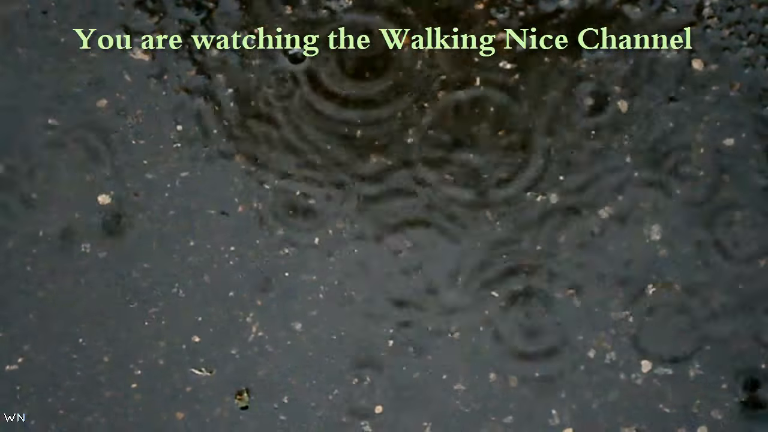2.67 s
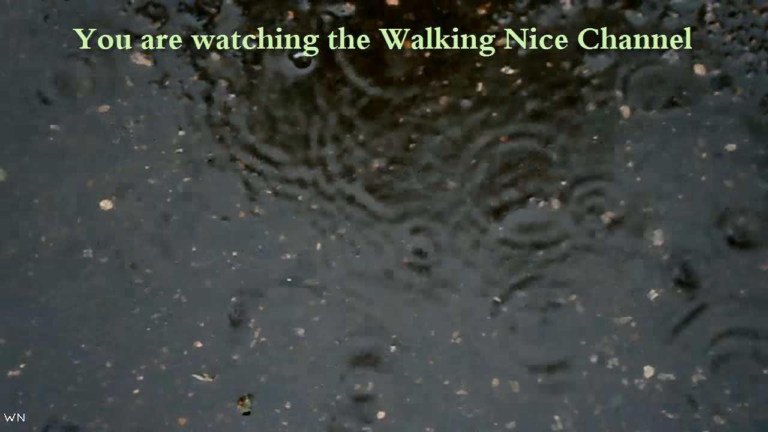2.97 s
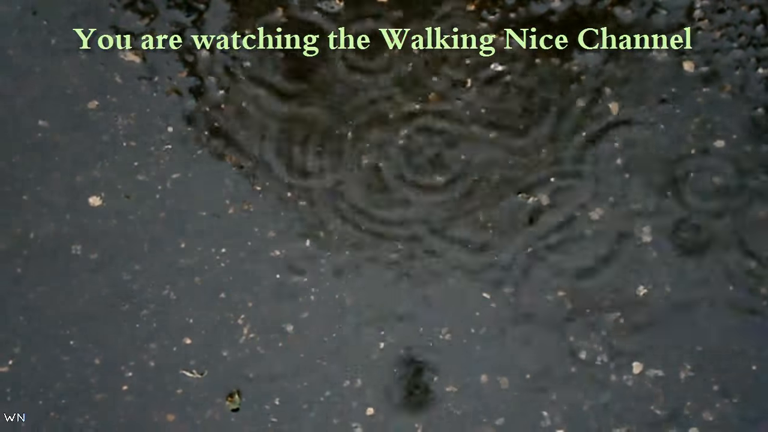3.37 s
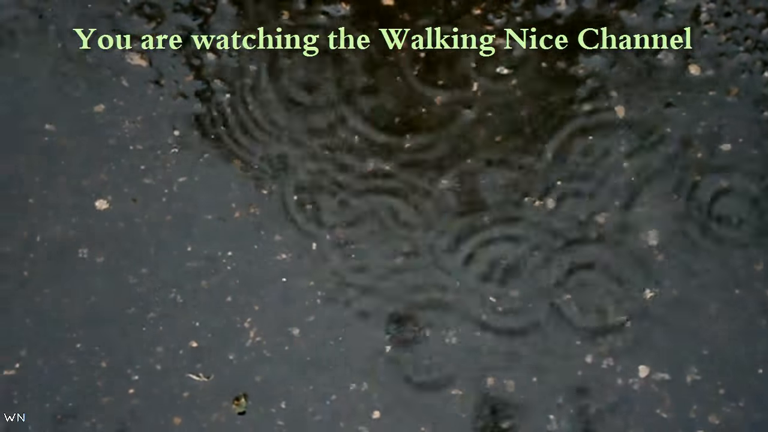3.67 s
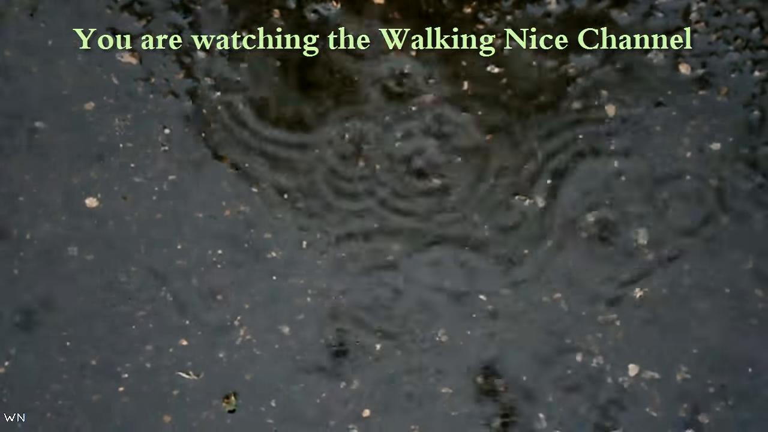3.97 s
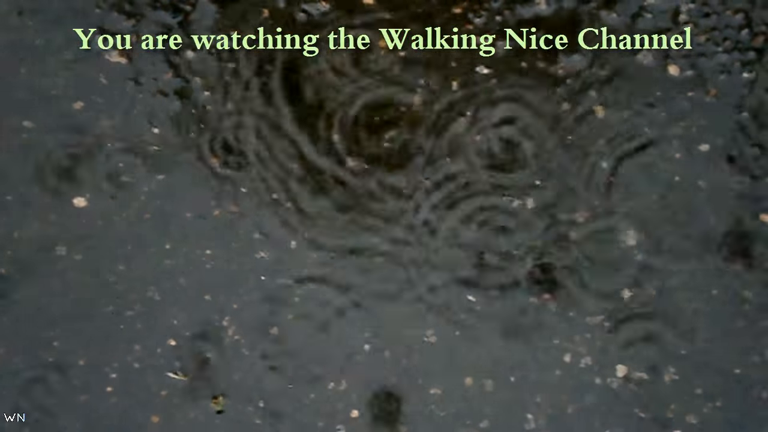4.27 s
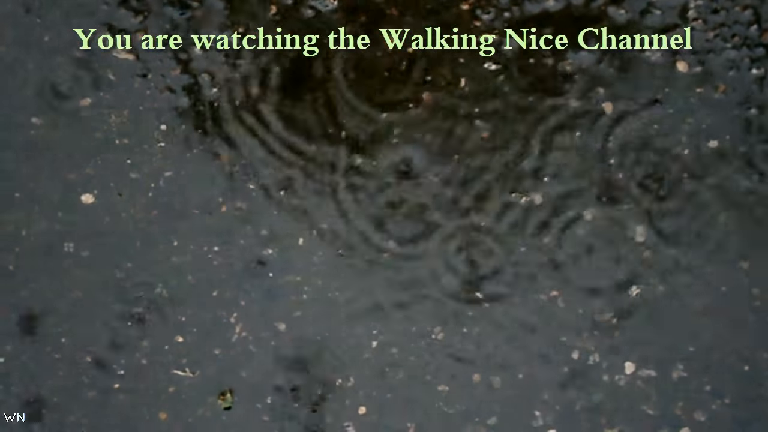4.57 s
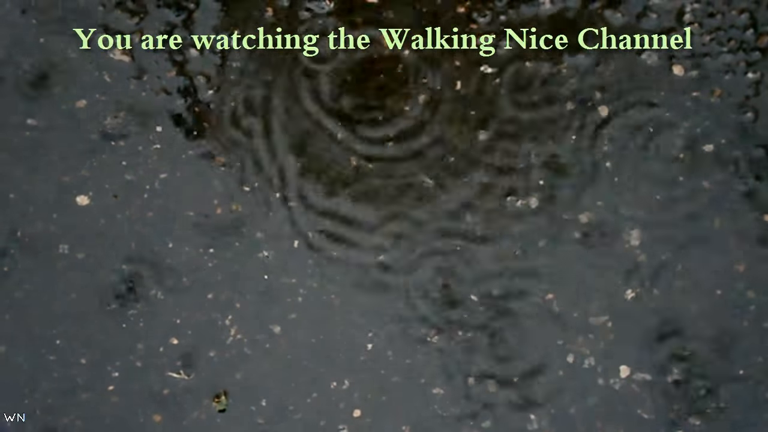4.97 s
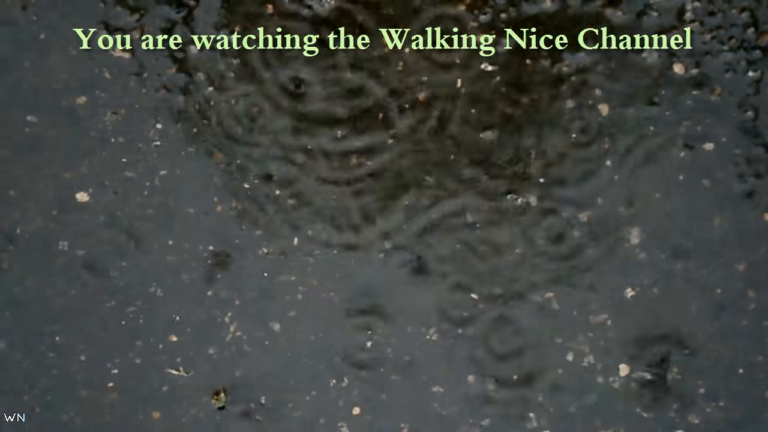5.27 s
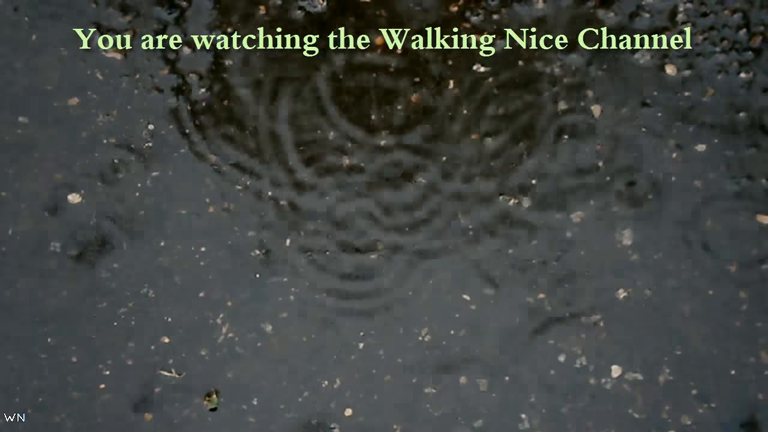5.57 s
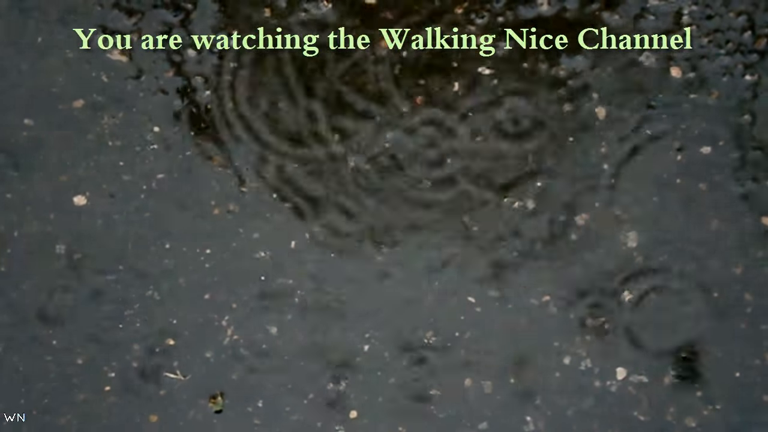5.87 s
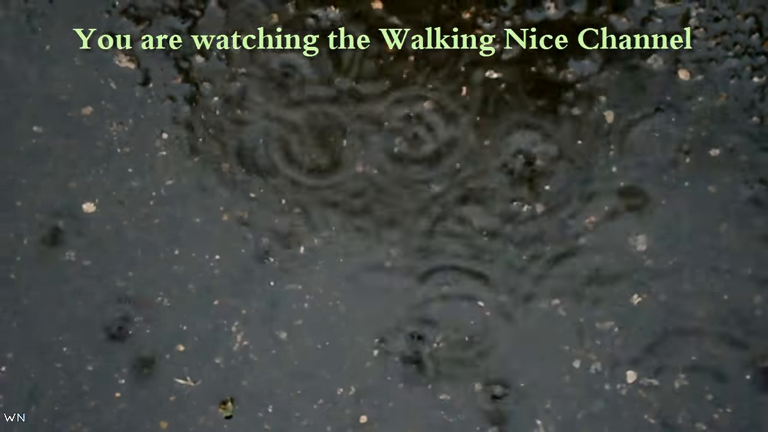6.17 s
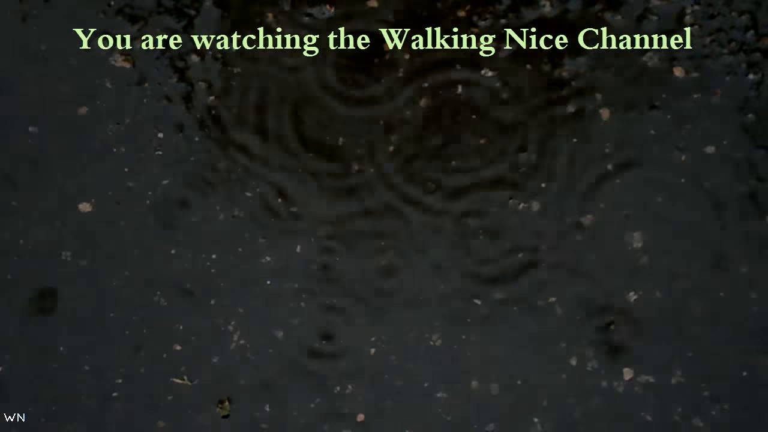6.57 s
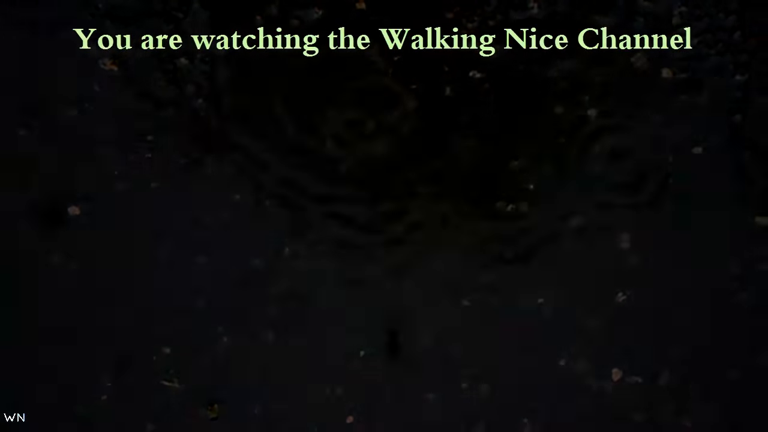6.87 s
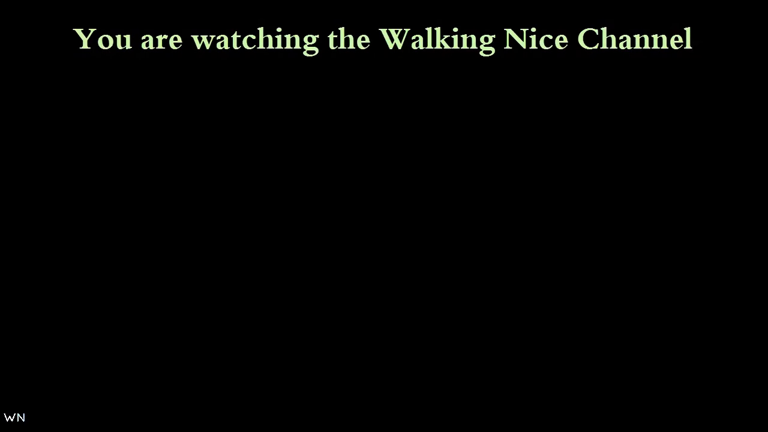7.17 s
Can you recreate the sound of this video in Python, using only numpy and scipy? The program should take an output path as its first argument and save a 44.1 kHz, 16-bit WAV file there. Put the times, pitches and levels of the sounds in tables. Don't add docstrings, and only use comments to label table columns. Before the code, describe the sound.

Steady rain on wet pavement and a puddle, captured close by a cheap camera with a coarse, gritty, brittle top end. From 0 s a smooth far wash and dense fine patter run continuously, dipping slightly around 0.5 s. Irregular nearby drops snap over it as short clumps of bright ticks with tiny sprays. At about 0.75 s a puddle plop comes with a hard knock on the housing and watery chirps; more splashes cluster near 1.1-1.3 s, and low bubble blips follow around 1.5-1.8 s. From 2.9 to 3.8 s the rain is busiest, with strong plops, rising bubble chirps and the hardest bump near 3.1 s, another at 3.7 s. From 4.2 s everything fades gradually, scattered ticks still audible. A last faint cluster of splashes, bubbles and a double knock comes near 6.8 s, then silence by about 7.2 s.

```python
import sys
import numpy as np
from scipy import signal
from scipy.fft import rfft, irfft, next_fast_len
from scipy.io import wavfile
from scipy.ndimage import uniform_filter1d, map_coordinates

SR = 44100
rng = np.random.default_rng(int(sys.argv[2]) if len(sys.argv) > 2 else 0)


def ratio_of_db(decibels):
    return 10 ** (np.asarray(decibels, float) / 20)


def master_out(mix):
    frames = np.transpose(np.atleast_2d(mix))
    ceiling = np.clip(frames, -1, 1)
    pcm = np.round(ceiling * 32767).astype(np.int16)
    wavfile.write(sys.argv[1], SR, pcm)


N = 322812

# (time [s], patter level [dB], far wash level [dB])
RAIN = [(0, -33.5, -36), (.4, -36, -35.5), (.55, -37, -36), (.9, -34, -36.5), (1.4, -35, -36.5),
        (1.65, -33.5, -35.5), (2.3, -35, -36.5), (2.75, -33.5, -36), (3.1, -33, -36), (3.5, -31.5, -35),
        (3.75, -32.5, -36.5), (4.2, -32, -36), (4.8, -34, -37), (5.6, -35, -36.5), (6.3, -33.5, -36),
        (6.7, -33.5, -35.5), (7.3, -33, -39.5)]
# (frequency [Hz], level per Hz [dB])
WASH_COLOUR = [(35, -32), (60, -11), (200, -4.5), (420, -4.5), (740, 0.83), (1280, 1.5), (1520, -2.5),
               (2460, -2), (3400, 0.5), (4200, 5), (4700, -43)]
# (frequency [Hz], width [Hz], level [dB])
GROUND_RINGS = [
    (1300, 890, -18),
    (2097, 840, -7.5),
    (2900, 550, -3),
    (3373, 506, 1),
    (3719, 150, -4),
    (4040, 670, -5),
]
# (time [s], peak level [dB], pitch [Hz], time to fall 60 dB [s])
BUBBLES = [(0.778, -27, 2390, 0.04), (0.848, -26, 2250, 0.04), (1.302, -25, 2290, 0.04),
           (1.478, -29.5, 925, 0.04), (1.523, -23, 2180, 0.037), (1.575, -32, 740, 0.044),
           (1.764, -27, 665, 0.048), (2.864, -23, 2330, 0.037), (2.919, -25, 1600, 0.031),
           (3.032, -37, 670, 0.055), (3.251, -28, 2170, 0.04), (3.291, -36, 1590, 0.056),
           (3.368, -22.5, 2350, 0.037), (3.847, -25.5, 1255, 0.037), (5.531, -30, 1390, 0.04),
           (5.763, -25, 1650, 0.035), (6.229, -35, 2100, 0.04), (6.275, -26, 1000, 0.04),
           (6.509, -23, 1110, 0.04), (6.66, -29, 1700, 0.04), (6.691, -28, 1590, 0.04),
           (6.706, -24, 2060, 0.04), (6.784, -27, 1780, 0.04), (6.822, -21, 2400, 0.045),
           (6.828, -33.7, 1300, 0.04), (7.056, -25, 1750, 0.044)]
# (time [s], push level [dB], length [ms])
KNOCKS = [
    (0.7502, -8.5, 0.26),
    (1.1635, -23.5, 0.58),
    (1.82, -24, 0.36),
    (2.312, -28, 0.9),
    (3.1397, -7.5, 0.46),
    (3.6693, -8.5, 0.28),
    (4.859, -21, 0.36),
    (6.8102, -8, 0.26),
    (6.8181, -9, 0.3),
]
# (time [s], peak level [dB], spray level [dB])
HEAVY = [(0.0877, -18, -28), (0.3619, -18, -30), (1.0962, -13.5, -25), (1.1273, -12, -27),
         (1.166, -15.5, -21.5), (1.3097, -14.5, -26), (1.659, -13, -32), (1.8046, -18.5, -18.5),
         (2.2552, -15.7, -30.5), (2.3134, -10.5, -25.5), (2.3907, -17, -25), (2.5876, -13, -32),
         (2.9071, -12.5, -27), (3.1445, -15.5, -29), (3.2573, -13, -33.5), (3.2768, -14, -20),
         (3.2907, -15, -33.5), (3.7125, -13.5, -34.5), (4.4296, -18, -19.5), (4.6227, -11.5, -35),
         (4.8593, -12, -21), (5.15, -15.4, -22), (5.1582, -18, -21), (5.354, -12.5, -26),
         (5.815, -13, -21.5), (5.8506, -15, -34.5), (5.9937, -11, -33.5), (6.1485, -10, -26),
         (6.3777, -14.5, -21.5), (6.8199, -11.4, -27.5)]
# (time [s], peak level [dB])
LIGHT = [(0.0794, -13), (.1379, -18), (0.3395, -16.5), (0.3754, -17.5), (.5952, -13.5), (.7999, -28),
         (.878, -17.5), (.9983, -25), (1.5072, -19), (1.7387, -16), (2.0657, -18.5), (2.1759, -17.5),
         (2.2198, -12), (2.2952, -17.5), (2.5056, -24.5), (2.523, -14.5), (3.0445, -12.5), (3.082, -18),
         (3.2035, -17), (3.3883, -16), (3.9964, -17), (3.6958, -20.5), (4.0334, -17), (4.4974, -20),
         (4.7851, -18), (5.4604, -16.5), (5.6987, -16), (5.8852, -12), (6.5923, -16.3), (7.059, -19.5)]
# (time [s], peak level [dB], deeper part against the peak [dB], spray level [dB])
PLOPS = [(.1966, -18.5, -24, -22), (.6528, -21, -16, -39), (0.7493, -13.5, -6.5, -24.5),
         (0.7751, -14.5, -4.5, -20.5), (.8496, -35, -2, -20), (1.0817, -21, -7, -29),
         (1.2078, -17.1, -10, -23), (1.29, -23, -7, -21.5), (1.5293, -26, -5, -27), (1.615, -17, -5, -24.5),
         (2.0093, -18, -23, -20.5), (2.5578, -17.5, -24, -32), (2.7031, -17.5, -10, -33),
         (2.8647, -13, -20, -22.5), (2.8785, -20.4, -3, -21), (3.0032, -17.5, -16, -20.5),
         (3.1403, -7.5, -10, -24.5), (3.1646, -20, -13, -39), (3.2352, -18, 1, -22.5),
         (3.2409, -12, -14, -36), (3.6677, -13.5, -8.5, -22), (3.7615, -19, -16, -22),
         (3.8918, -15.5, -15.5, -32), (4.4006, -12, -13, -31.5), (5.0673, -21, -4, -20.5),
         (5.3758, -21, -7.6, -21), (5.566, -19.5, -9, -38.5), (5.7822, -16, -19, -33),
         (6.1719, -15.5, -13.5, -26.5), (6.8077, -14, -16, -16)]
# (time [s], gain [times])
FADE = [
    (0, 1),
    (4.23, 1),
    (7.238, 0),
]

PAVEMENT_DEEP_DB, LIGHT_SPRAY_DB = -21.5, -10
SPRAY_DB, SPRAY_T60_S, SPRAY_RISE_S = 1, 0.1, 0.0035
STRAYS = 190
STRAY_DB, STRAY_SPREAD_DB, STRAY_DEEP_DB, STRAY_SPRAY_DB = -23, 1.12, -17, -13.5
SNAP_DB, SNAP_LAG = 8, 30
CLOCK_HZ = 8000
SLIP, SLIP_EVERY, SLIP_LEAD = 2, 11023, 1000
EDGE_HZ = 15740


def evened(x):
    return x / np.sqrt(np.mean(x ** 2) + 1e-20)


def along(rows, column):
    rows = np.array(rows)
    return np.interp(np.arange(N) / SR, rows[:, 0], rows[:, column])


def add(mix, s, sound):
    part = mix[round(s * SR):][:len(sound)]
    part += sound[:len(part)]


def coloured(x, points):
    size = next_fast_len(len(x))
    f, db = np.transpose(points)
    hz = np.fft.rfftfreq(size, 1 / SR)
    gain = ratio_of_db(np.interp(np.log(hz + 1), np.log(f + 1), db, right=-90))
    return irfft(rfft(x, size) * gain, size)[:len(x)]


def wander(width_s):
    size = round(width_s * SR)
    smooth = uniform_filter1d(rng.standard_normal(N), size)
    return evened(uniform_filter1d(smooth, size))


def ring(x, hz, width_hz):
    r = np.exp(-np.pi * width_hz / SR)
    return signal.lfilter([1, 0, -1], [1, -2 * r * np.cos(2 * np.pi * hz / SR), r * r], x)


def wash():
    noise = evened(coloured(rng.standard_normal(N), WASH_COLOUR))
    flicker_db = 1.5 * wander(0.012)
    return noise * ratio_of_db(along(RAIN, 2) + flicker_db)


def rain_power(near):
    power = ratio_of_db(along(RAIN, 1)) ** 2
    t = np.arange(6000) / SR
    rise = np.minimum(t / (2 * SPRAY_RISE_S), 1)
    cloud = (rise * ratio_of_db(-60 * t / SPRAY_T60_S)) ** 2
    for s, _, _, spray_db in near:
        add(power, max(s - SPRAY_RISE_S, 0), ratio_of_db(spray_db + SPRAY_DB) ** 2 * cloud)
    return power


def patter(near, per_s=1700, spread_db=1.4, clump_db=.8):
    power = rain_power(near)
    size = ratio_of_db(spread_db * np.minimum(rng.exponential(1, N), 3)) * rng.choice([-1., 1.], N)
    lands = rng.random(N) < per_s / SR
    ticks = evened(size * lands * ratio_of_db(clump_db * wander(0.01))) * np.sqrt(power)
    patch = rng.integers(0, len(GROUND_RINGS), N)
    out = np.zeros(N)
    for k, (hz, width, db) in enumerate(GROUND_RINGS):
        rung = ring(ring(ticks * (patch == k), hz, width), hz, 1.18 * width)
        out += ratio_of_db(db) * evened(rung)
    return evened(out) * np.sqrt(power.mean())


def bubbles(rise=5.6):
    out, t = np.zeros(N), np.arange(3000) / SR
    for s, db, hz, t60 in BUBBLES:
        tone = np.sin(2 * np.pi * hz * (t + rise * t ** 2 / 2))
        onset = 1 - np.exp(-t / 0.00033)
        add(out, s, ratio_of_db(db - 0.5 - 60 * t / t60) * onset * tone)
    return out


def knocks():
    out, t_ms = np.zeros(N), (np.arange(88) - 44) / SR * 1000
    for s, db, ms in KNOCKS:
        push = np.exp(-(2 * t_ms / ms) ** 8)
        add(out, s - 44 / SR, -ratio_of_db(db) * push)
    return out


def near_drops():
    when, size, depth = rng.random((STRAYS, 3)).T
    stray_s = when * (N / SR - .05)
    stray_db = STRAY_DB - STRAY_SPREAD_DB * np.log(1 - size + 0.011)
    stray_deep_db = STRAY_DEEP_DB + 16.0 * (depth - .5)
    strays = list(zip(stray_s, stray_db, stray_deep_db, stray_db + STRAY_SPRAY_DB))
    heavy = [(s, db, PAVEMENT_DEEP_DB, spray_db) for s, db, spray_db in HEAVY]
    light = [(s, db, PAVEMENT_DEEP_DB + 5.5, db + LIGHT_SPRAY_DB) for s, db in LIGHT]
    return heavy + PLOPS + light + strays


def splash(db, deep_db, draws, t60=0.01, per_s=1400):
    t = np.arange(draws.shape[1]) / SR
    ticks = draws[0] * (draws[1] < per_s / SR)
    ticks[0] = 1.1 * np.sign(draws[0, 0])
    ticks = ticks * ratio_of_db(-60 * t / t60)
    film_hz = 3600 + 600 * (draws[1, 0] - .5)
    puddle_hz = 2100 + 800 * (draws[1, 1] - .5)
    film = ring(ring(ticks, film_hz, 380), film_hz, 800)
    puddle = ring(ticks, puddle_hz, 800)
    snap = ring(ticks * (t == 0), 3300, 2600)
    soften = signal.butter(6, 4300., fs=SR, output="sos")
    film, puddle, snap = (signal.sosfilt(soften, v) for v in (film, puddle, snap))
    snap = ratio_of_db(deep_db + SNAP_DB) * np.roll(snap, SNAP_LAG) / abs(snap).max()
    puddle = ratio_of_db(deep_db + 6.0) * puddle / abs(puddle).max()
    return ratio_of_db(db) * (film / abs(film).max() + snap + puddle)


def drops(near):
    out = np.zeros(N)
    for s, db, deep_db, _ in near:
        draws = np.array([rng.standard_normal(900), rng.random(900)])
        add(out, max(s - .0011, 0), splash(db, deep_db, draws))
    return out * ratio_of_db(0.7)


def scene():
    near = near_drops()
    return (wash() + patter(near) + bubbles() + knocks() + drops(near))[None]


def sample_and_hold(x):
    n = np.arange(N)
    slips = SLIP * ((n + SLIP_LEAD) // SLIP_EVERY)
    clock = (n - .5 + slips) * CLOCK_HZ / SR
    taken_at = n - (clock % 1 - .5) * SR / CLOCK_HZ
    return map_coordinates(x, [taken_at], order=3, mode="nearest")


def band_limit(x):
    return signal.sosfilt(signal.butter(12, 16670, fs=SR, output="sos"), x)


def record(dry):
    held = np.clip(sample_and_hold(dry[0]), -.245, .235) - .0017
    edge = signal.firwin(801, EDGE_HZ, window=("kaiser", 9), fs=SR)
    mix = signal.oaconvolve(held * along(FADE, 1), edge, "same")[None]
    return band_limit(mix)


dry = scene()
out = record(dry)
master_out(out)
```